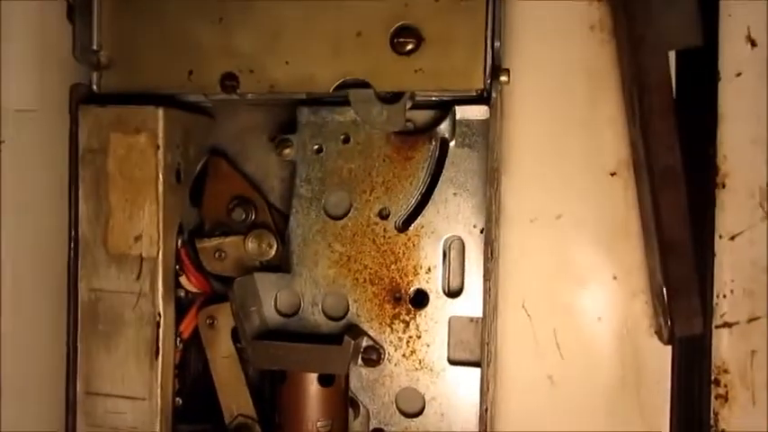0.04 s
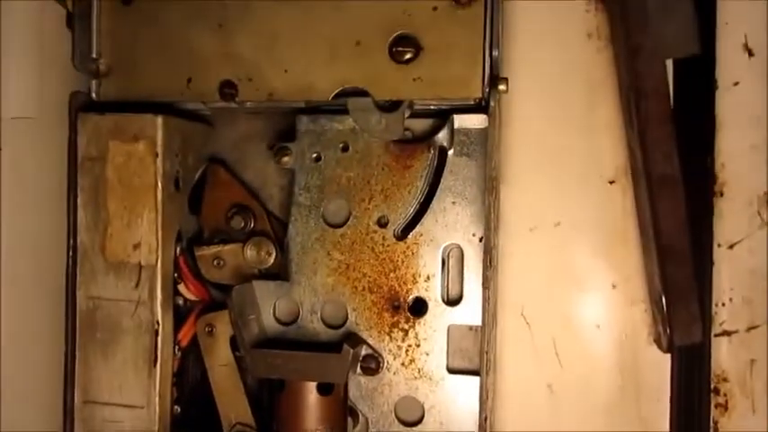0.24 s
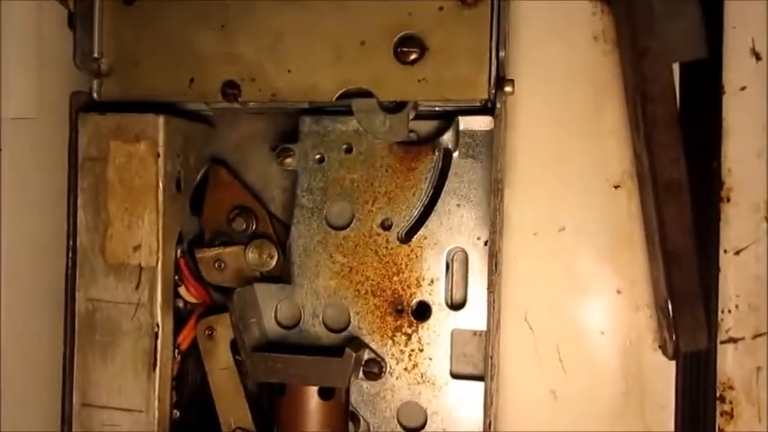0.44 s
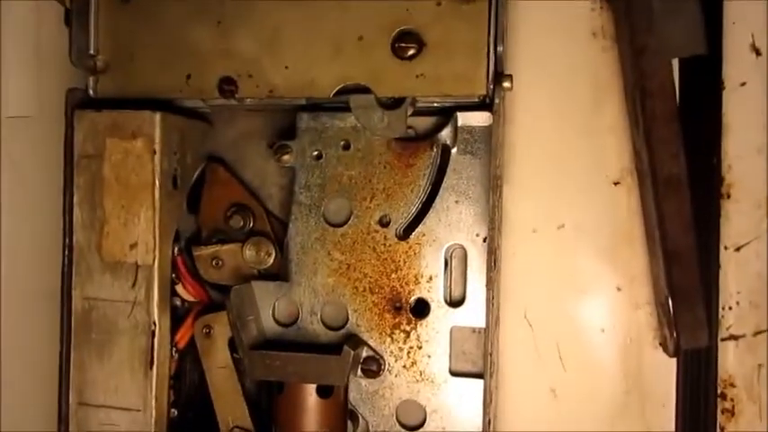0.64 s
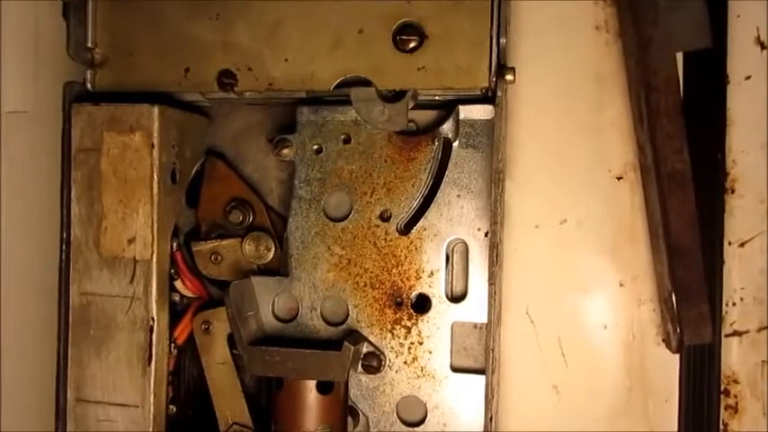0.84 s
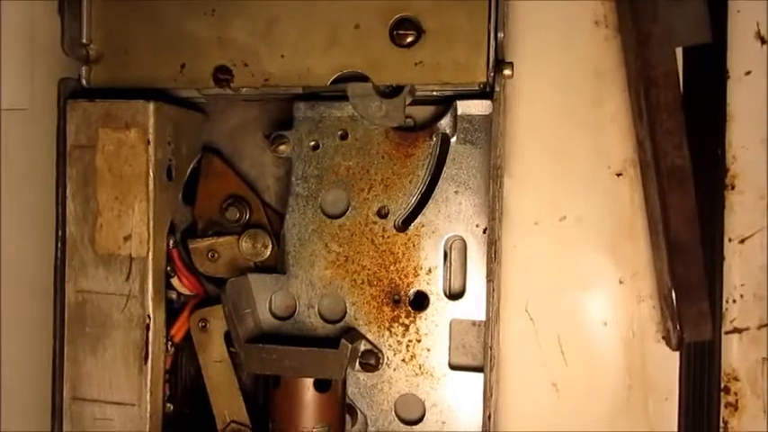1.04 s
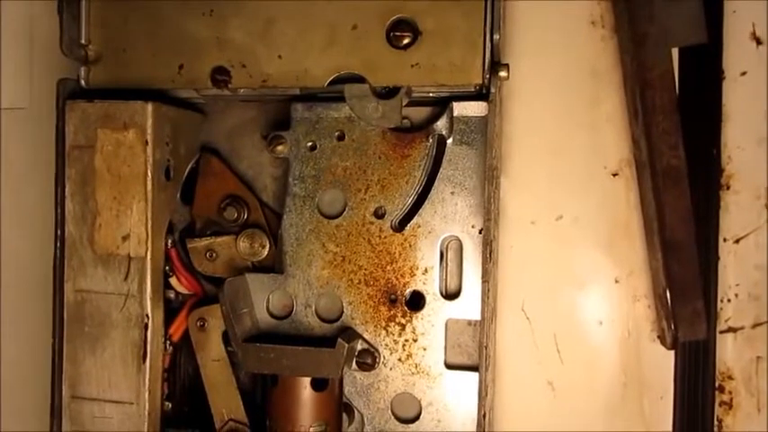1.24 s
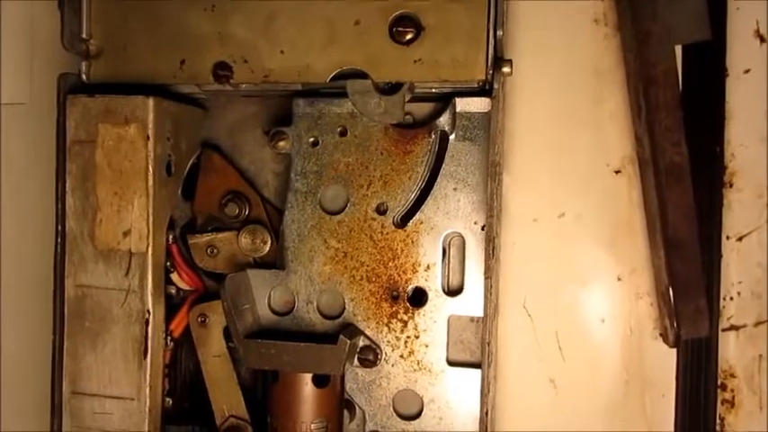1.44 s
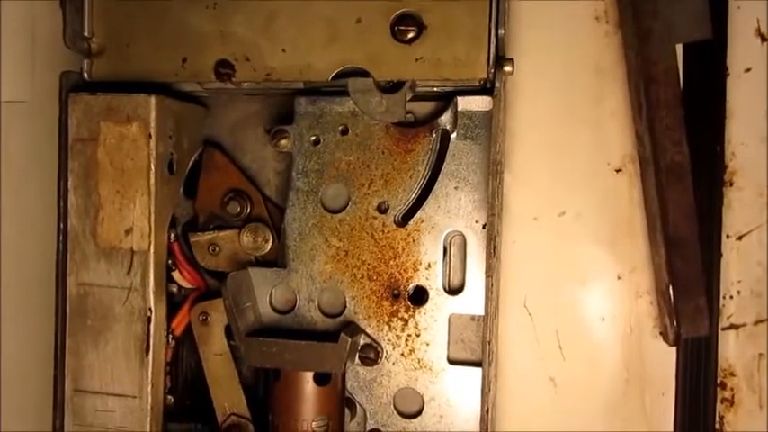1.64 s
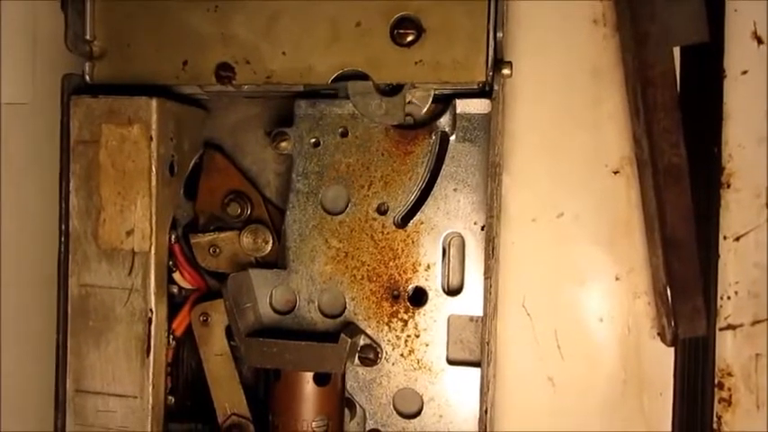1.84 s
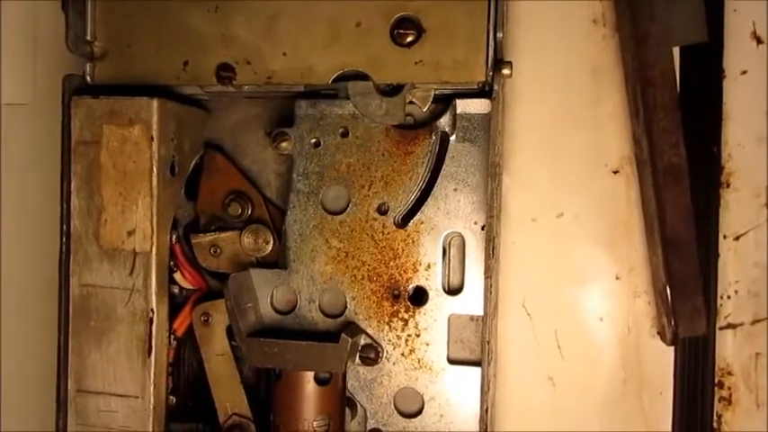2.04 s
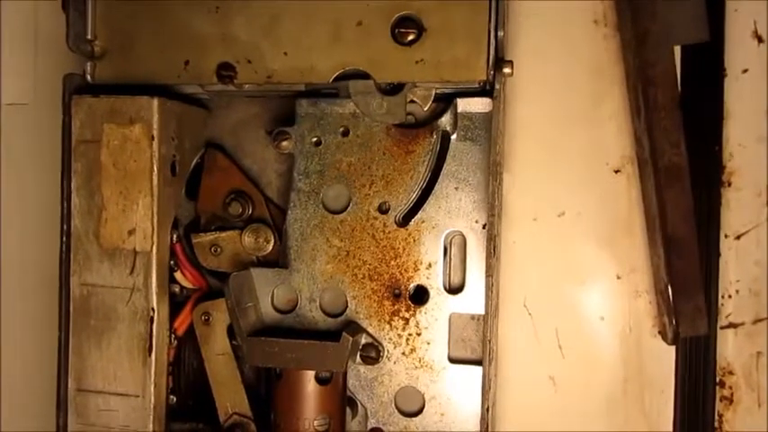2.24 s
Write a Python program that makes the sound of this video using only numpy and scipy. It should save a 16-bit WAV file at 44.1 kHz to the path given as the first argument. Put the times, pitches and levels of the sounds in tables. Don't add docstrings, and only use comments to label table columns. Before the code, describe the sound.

A coin drops into a mechanical coin changer, clattering through metal levers over a low room hum

```python
import sys
import numpy as np
from scipy import signal
from scipy.fft import rfft, irfft, next_fast_len
from scipy.io import wavfile
from scipy.ndimage import uniform_filter1d, map_coordinates

SR = 44100
rng = np.random.default_rng(int(sys.argv[2]) if len(sys.argv) > 2 else 0)


def bounce(signal):
    frames = np.transpose(np.atleast_2d(signal))
    limited = np.clip(frames, -1, 1)
    pcm = np.round(limited * 32767).astype(np.int16)
    wavfile.write(sys.argv[1], SR, pcm)


def amplitude_ratio(level_db):
    exponent = np.asarray(level_db, float) / 20
    return 10 ** exponent


N = 100239

# time in seconds, room air in dB, motor in dB.
HUM_LEVELS = [(0, -41, -44.5), (.2, -41, -45.5), (.4, -38, -49), (.6, -38.5, -38), (.72, -36, -41),
              (.84, -37, -55), (.95, -36, -38.5), (1.1, -40.5, -59), (1.45, -38, -54.5),
              (1.58, -43.5, -50.5), (1.8, -42.5, -48.5), (2.0, -45, -55), (2.17, -45.5, -45.5),
              (2.27, -44, -49)]
# frequency in Hz, density in dB per Hz.
AIR_SPECTRUM = [(15, -47), (25, -8), (59, -8), (96, -4.5), (196, -0.5), (380, -11), (426, -10),
                (638, -15.5), (1200, -22.5), (1560, -31.5), (2640, -120)]
# frequency in Hz, density in dB per Hz.
HISS_SPECTRUM = [(590, -1.5), (1000, -16.5), (1620, -6), (1880, -7.5), (5920, -24.5), (8060, -27.5),
                 (8740, -28.5), (14500, -41.5), (15500, -54)]
# frequency in Hz, width in Hz, level in dB.
CAMERA_WHINE = [
    (8050, 600, -34),
    (9900, 600, -43),
]
# frequency in Hz, t60 in seconds.
ROOM_DECAY = [(500, 0.75), (3000, 0.57), (8000, 0.22), (15000, 0.13)]
# start in seconds, frequency in Hz, level in dB, t60 in seconds.
PART_CHIMES = [(.9702, 5550, -7.5, 0.022), (.9702, 4100, -17, 0.058), (.9702, 2910, -20.5, 0.056),
               (.973, 3690, -17.5, 0.06), (.998, 2820, -41, 0.027), (1.0046, 6630, -21.5, 0.028),
               (1.0046, 4710, -26, 0.047), (1.0125, 2817, -16.5, 0.038), (1.0125, 5500, -22, 0.041),
               (1.0136, 8150, -10.5, .015), (1.062, 1595, -22.5, 0.07), (1.0375, 9200, -23, 0.018),
               (1.1515, 4970, -29, 0.038), (1.1515, 3800, -43, 0.081), (1.17, 5620, -25, .025),
               (1.417, 2630, -21, .025), (1.472, 2710, -35, 0.027), (1.5207, 2560, -18, 0.029),
               (1.5207, 3900, -22, 0.028), (1.5207, 5980, -31, 0.035), (1.5207, 7430, -21.5, .015),
               (1.6026, 7060, -28, 0.022), (1.6026, 3940, -26, 0.025), (1.6026, 2525, -31.5, 0.055),
               (1.6405, 2730, -42, .03), (1.735, 2550, -18, 0.054), (1.735, 5630, -17.5, 0.026),
               (1.735, 4480, -21.5, 0.033), (1.735, 893, -36, 0.063), (1.846, 7720, -19, 0.028),
               (1.846, 3750, -29.5, 0.043), (1.86, 5800, -24.5, 0.018), (1.86, 1840, -26.5, .04),
               (1.9114, 2720, -28.5, .03), (1.9114, 7311, -21.5, .03), (1.9332, 3680, -15, 0.019),
               (1.9332, 4320, -22.5, 0.029), (1.9332, 6750, -13, .018), (1.935, 1620, -29.5, 0.061),
               (1.9533, 6860, -23, 0.022), (2.0035, 2810, -27, .03), (2.028, 3570, -19, .03)]
# time in seconds, peak in dB.
SHARP_EDGES = [
    (.998, -8),
    (1.0052, -5),
    (1.0154, 1),
    (1.062, -6),
    (1.5214, 4),
    (1.7364, -3),
    (1.934, 5),
    (1.9551, -5),
]
COIN_TWINS_HZ = [13460, 13830]
# start in seconds, length in seconds, level in dB, upper twin minus lower in dB.
COIN_FLIGHTS = [(.952, .02, -67, -6), (.976, .024, -47, -4), (.998, .058, -43, 3), (1.062, .03, -62, -4),
                (1.172, .065, -62, -6), (1.317, .025, -62, 10), (1.374, .04, -57, -10),
                (1.524, .07, -50, 8), (1.545, .04, -38, 15), (1.604, .045, -47, 3), (1.642, .045, -56, 0),
                (1.738, .06, -59, -5), (1.775, .07, -61, 8), (1.85, .06, -52, -6), (1.862, .032, -37, -15),
                (1.91, .047, -48, 0), (2.003, .026, -52, 0), (2.056, .032, -49, -5)]
# start in seconds, length in seconds, frequency in Hz, level in dB.
LOWER_MODES = [
    (.92, .025, 5460, -56),
    (.92, .045, 2300, -54),
    (.924, .024, 9280, -63),
    (1.521, .04, 9280, -45),
    (1.555, .009, 4100, -38),
    (1.563, .024, 4050, -28),
    (1.788, .012, 2600, -46),
    (1.38, .035, 1625, -48),
    (1.064, .028, 5800, -46),
]
# time in seconds, peak in dB, struck pitch in Hz, low clank in dB, t60 in seconds.
ENTRY_BLOWS = [(0.9708, -18, 4100, -9, 0.037), (0.977, -13, 7300, -33, 0.028),
               (0.9795, -11, 2650, -12, 0.085), (0.999, -8, 2560, -23, 0.051),
               (1.0046, -10, 5650, -17, 0.058), (1.0112, -13, 5500, -18, 0.031),
               (1.0187, -9.5, 2440, -16.5, 0.029), (1.038, -15, 2850, -22, 0.043),
               (1.0615, -5, 7570, -18, 0.03), (1.151, -15, 9000, -20.5, 0.039),
               (1.1694, -6, 5800, -19, 0.032), (1.2164, -14, 2660, -11, 0.051),
               (1.3129, -20.5, 2520, -13, 0.054), (1.3714, -21.5, 4630, -21, 0.053),
               (1.4173, -10, 2600, -14.5, 0.029), (1.4716, -19, 2700, -9.5, 0.036)]
# time in seconds, peak in dB, struck pitch in Hz, low clank in dB, t60 in seconds.
SORTER_BLOWS = [(1.5204, -0.5, 3960, -28, 0.022), (1.5644, -16, 7500, -40, 0.037),
                (1.5686, -13.5, 4040, -24, 0.082), (1.6025, -6.5, 7500, -21.5, 0.043),
                (1.6406, -13, 3680, -24.5, 0.044), (1.7292, -9, 3150, -25, 0.064),
                (1.735, -6.5, 5800, -33, 0.044), (1.846, -4, 9030, -23, 0.034),
                (1.8607, -10, 5500, -17.5, 0.05), (1.9115, -10, 5030, -24.5, 0.046),
                (1.916, -12, 4460, -33, 0.024), (1.9344, -3, 4100, -25.5, 0.019),
                (1.9525, -5.5, 3200, -24, 0.026), (2.0038, -11.5, 5300, -20, 0.032),
                (2.027, -8, 3406, -24, 0.063), (2.0364, -11, 3070, -18.5, 0.042),
                (2.056, -14.5, 4310, -17, 0.047)]
# time in seconds, peak in dB, struck pitch in Hz, low clank in dB, t60 in seconds.
SECOND_BLOWS = [
    (1.0146, -7, 7940, -20.5, 0.0075),
    (1.74, -12.5, 4500, -34.5, 0.023),
    (1.954, -5.5, 10000, -35.5, 0.0067),
]
# time in seconds, peak in dB, struck pitch in Hz.
LIGHT_TAPS = [(0.942, -25.5, 5100), (.992, -25, 7000), (1.01, -21, 5500), (1.183, -18, 7500),
              (1.192, -31, 4960), (1.197, -18, 4570), (1.21, -21.5, 2540), (1.3442, -22, 5500),
              (1.361, -31, 6500), (1.383, -28, 4830), (1.411, -26, 9000), (1.443, -29, 2700),
              (1.496, -25, 2570), (1.556, -42, 4100), (1.581, -29.5, 4200), (1.79, -36, 6000),
              (1.684, -30.5, 3560), (1.7742, -26.5, 3440), (1.796, -29, 6000), (1.804, -27.5, 4100),
              (1.811, -40, 3970), (1.893, -26.5, 5500), (1.922, -15, 4500), (2.048, -20.5, 4380)]
# frequency in Hz, level in dB, t60 in seconds.
PLATE_MODES = [(1344, 9.5, 0.06), (1620, 7.5, 0.11), (2230, 1, 0.084), (2640, -2.5, 0.045),
               (2820, 3, 0.035), (3700, -4.5, 0.016), (3900, -2, 0.021), (3960, 0, .05), (5500, -10, 0.03),
               (5400, -7.5, 0.025), (6950, -19, 0.0121)]
# frequency in Hz, level in dB.
CRACK_SPECTRUM = [(300, -25), (600, 1), (2000, -0.5), (3000, -2.5), (7000, -1.5), (10000, -2),
                  (14000, -5.5), (15200, -32.5)]

AIR_DB, HISS_DB, HISS_FOLLOWS_SHARE = 2, -11, 0.55
MOTOR_HZ, MOTOR_DRIFT_HZ = 67.9, 1.2
ROOM_DB, ECHO_STEP_SAMPLES, ECHO_DELAY_SAMPLES = -23.5, 2205, 60
RATTLE_DB, RATTLE_RATE_HZ = 5, 500
EDGE_HZ, EDGE_T60_S, EDGE_LOW_HZ = 5500, 0.0016, 1500
SWELL_POWER, FLICKER_DB = 0.8, 2.5
RISE_S, GRIT_DB, SPIKE_GAIN, SPIKE_T60_S = 0.00029, 1, 0.36, 0.0022
TREBLE_HZ, TREBLE_LIFE_RATIO, SOFT_DULLS_RATIO = 7000, 0.48, 0.31
STRUCK_DB, STRUCK_OCTAVES, STRUCK_RING_DB, STRUCK_T60_S = 7.5, 0.28, -4.5, 0.012
PLATE_RING_DB, PLATE_SCATTER_DB = -14.5, 4.5
PLATE_COLOUR_DB, PLATE_WIDTH_HZ, CHANCE_PEAK_DB = 3.5, 70, 1.5
LOW_CLANK_DB, TAP_LOW_DB, TAP_T60_S = 12.5, -15.5, 0.018
MIC_TOP_HZ = 15200


def unit(x):
    return x / np.sqrt(np.mean(x ** 2, axis=-1, keepdims=True) + 1e-20)


def along(points, hz):
    point_hz, value = np.transpose(points)
    return np.interp(np.log(hz + 1), np.log(point_hz + 1), value)


def wobble(rate_hz):
    knots = rng.standard_normal(int(N * rate_hz / SR) + 4)
    return map_coordinates(knots, [np.arange(N) * rate_hz / SR])


def noise(gain, patchy_db=0):
    length = next_fast_len(N + 4096)
    cells = signal.stft(rng.standard_normal(length), nperseg=512)[2]
    patches = uniform_filter1d(rng.standard_normal(cells.shape), size=6, axis=0)
    patches = uniform_filter1d(patches, size=14, axis=1)
    patchy = signal.istft(cells * amplitude_ratio(patchy_db * patches / patches.std()), nperseg=512)[1][:length]
    shaped = irfft(rfft(patchy) * gain(np.fft.rfftfreq(length, 1 / SR)), length)
    return unit(shaped[2048:][:N])


def band(hz, width_hz):
    return lambda f: 1 / (1 + ((f - hz) / width_hz * 2) ** 2)


def causal(db):
    cepstrum = irfft(db * np.log(10) / 20)
    half = len(cepstrum) // 2
    cepstrum[1:half] *= 2
    cepstrum[half + 1:] = 0
    return np.exp(rfft(cepstrum))


def decaying_tone(hz, db, t60_s, t):
    return amplitude_ratio(db - 60 * t / t60_s) * np.sin(2 * np.pi * hz * t)


def hum():
    s, air_db, motor_db = np.transpose(HUM_LEVELS)
    t = np.arange(N) / SR
    air_db, motor_db = np.interp(t, s, air_db), np.interp(t, s, motor_db)
    air = noise(lambda f: amplitude_ratio(along(AIR_SPECTRUM, f)), patchy_db=0.6)
    air = air * amplitude_ratio(AIR_DB + air_db + wobble(7.87) / 2)
    hiss = amplitude_ratio(HISS_DB) * noise(lambda f: amplitude_ratio(along(HISS_SPECTRUM, f)), patchy_db=1.8)
    for hz, width_hz, db in CAMERA_WHINE:
        hiss = hiss + amplitude_ratio(db) * noise(band(hz, width_hz))
    hiss_db = air_db.mean() + HISS_FOLLOWS_SHARE * (air_db - air_db.mean())
    motor_turns = np.cumsum(MOTOR_HZ + MOTOR_DRIFT_HZ * wobble(5.68)) / SR
    motor = np.sqrt(2) * np.sin(2 * np.pi * motor_turns)
    return air + amplitude_ratio(hiss_db) * hiss + amplitude_ratio(motor_db + wobble(3.7)) * motor


def echoes(near):
    out = np.zeros(N + SR)
    for start in range(0, N, ECHO_STEP_SAMPLES):
        hz, t, cells = signal.stft(rng.standard_normal(SR // 4), SR, nperseg=256)
        decay = amplitude_ratio(-60 * t / along(ROOM_DECAY, hz)[:, None])
        tail = signal.istft(cells * decay, SR, nperseg=256)[1]
        tail = amplitude_ratio(ROOM_DB) * tail / np.linalg.norm(tail)
        wet = signal.fftconvolve(near[start:start + ECHO_STEP_SAMPLES], tail)
        out[start + ECHO_DELAY_SAMPLES:][:len(wet)] += wet
    return out[:N]


def chimes():
    out, t = np.zeros(N + SR), np.arange(4096) / SR
    rattle = np.pad(wobble(RATTLE_RATE_HZ), (0, SR))
    for k, (s, hz, db, t60_s) in enumerate(PART_CHIMES):
        uneven_db = RATTLE_DB * rattle[k * len(t) // 2:][:len(t)]
        out[round(s * SR):][:len(t)] += decaying_tone(hz, db + uneven_db, t60_s, t)
    return out[:N]


def sharp_edges():
    out, t = np.zeros(N + SR), np.arange(4096) / SR
    thin = signal.butter(2, EDGE_LOW_HZ, "high", fs=SR, output="sos")
    edge = signal.sosfilt(thin, decaying_tone(EDGE_HZ, 0, EDGE_T60_S, t))
    peak = np.abs(edge).argmax()
    for s, db in SHARP_EDGES:
        out[round(s * SR) - peak:][:len(t)] += amplitude_ratio(db) * edge / np.abs(edge[peak])
    return out[:N]


def coin():
    out, swells = np.zeros(N), []
    for s, length_s, db, twin_db in COIN_FLIGHTS:
        for hz, side in zip(COIN_TWINS_HZ, (-1, 1)):
            swells.append((s, length_s, hz, db + min(side * twin_db, 0)))
    for s, length_s, hz, db in swells + LOWER_MODES:
        t = np.arange(round(length_s * SR)) / SR
        swell = np.abs(np.sin(np.pi * t / length_s)) ** SWELL_POWER
        out[round(s * SR):][:len(t)] += amplitude_ratio(db) * swell * np.sin(2 * np.pi * (hz * t + rng.random()))
    return out * amplitude_ratio(FLICKER_DB * wobble(91))


def struck_colour_db(f, struck_hz, low_db):
    clank = along([(1800, low_db + LOW_CLANK_DB), (2400, 0.039)], f)
    octaves = np.log2((f + 1) / struck_hz)
    return clank + STRUCK_DB * np.exp(-(octaves / STRUCK_OCTAVES) ** 2)


def contacts():
    out, t = np.zeros(N + SR), np.arange(8192) / SR
    f = np.fft.rfftfreq(len(t), 1 / SR)
    plate_hz, plate_db, plate_t60_s = np.transpose(PLATE_MODES)[:, :, None]
    modes = len(plate_hz)
    treble = 1 / (1 + (TREBLE_HZ / (f + 1)) ** 4)
    plate_colour_db = PLATE_COLOUR_DB * (1 / (1 + ((f - plate_hz) / PLATE_WIDTH_HZ) ** 2)).max(0)
    rise = 1 - np.exp(-t / RISE_S)
    spike = 1 + SPIKE_GAIN * amplitude_ratio(-60 * t / SPIKE_T60_S)
    taps = [(*tap, TAP_LOW_DB, TAP_T60_S) for tap in LIGHT_TAPS]
    for s, db, struck_hz, low_db, t60_s in ENTRY_BLOWS + SORTER_BLOWS + SECOND_BLOWS + taps:
        grain, rough, chance, peaks = rng.standard_normal((4, len(t)))

        grit = grain * rise * spike * amplitude_ratio(GRIT_DB * unit(uniform_filter1d(rough, size=24)))
        body = rfft(grit * amplitude_ratio(-60 * t / t60_s))
        top = rfft(grit * amplitude_ratio(-60 * t / (t60_s * TREBLE_LIFE_RATIO)))
        peaks = uniform_filter1d(uniform_filter1d(peaks[:len(f)], size=30), size=30)
        colour_db = along(CRACK_SPECTRUM, f) + struck_colour_db(f, struck_hz, low_db)
        colour_db = colour_db + CHANCE_PEAK_DB * unit(peaks) + plate_colour_db
        mixed = body * (1 - treble) + top * treble * amplitude_ratio(SOFT_DULLS_RATIO * db)
        burst = irfft(mixed * causal(colour_db))

        mode_db = plate_db + struck_colour_db(plate_hz, struck_hz, low_db) - STRUCK_DB / 2
        mode_db = mode_db + PLATE_SCATTER_DB * chance[:modes, None]
        turns = plate_hz * t + chance[-modes:, None]
        ring = (amplitude_ratio(mode_db - 60 * t / plate_t60_s) * np.sin(2 * np.pi * turns)).sum(0)
        own = decaying_tone(struck_hz, STRUCK_RING_DB, STRUCK_T60_S + t60_s / 2, t)

        hit = burst / burst[:220].std() + (amplitude_ratio(PLATE_RING_DB) * ring + own) * rise
        out[round(s * SR):][:len(t)] += amplitude_ratio(db - 13.0) * hit / hit[:220].std()
    return out[:N]


def scene():
    near = contacts() + chimes() + sharp_edges() + coin()
    return (near + echoes(near) + hum())[None]


def roll_off(x):
    return signal.sosfilt(signal.butter(12, 16230, fs=SR, output="sos"), x)


def record(dry):
    low_pass = signal.butter(16, MIC_TOP_HZ, fs=SR, output="sos")
    mix = np.clip(signal.sosfilt(low_pass, dry), -1, 1)
    return roll_off(mix)


dry = scene()
out = record(dry)
bounce(out)
```